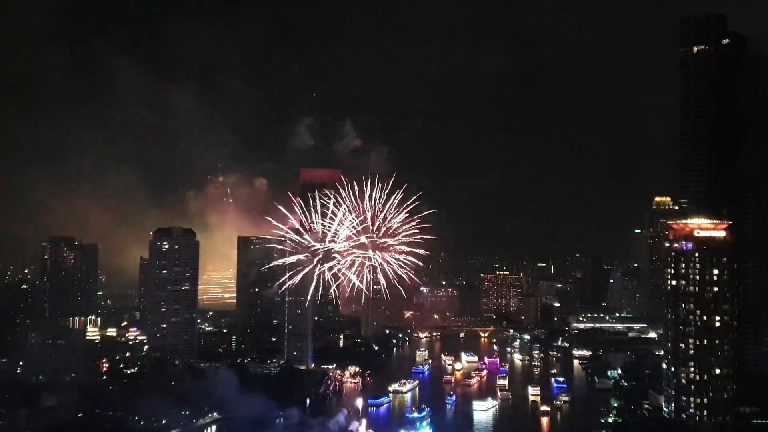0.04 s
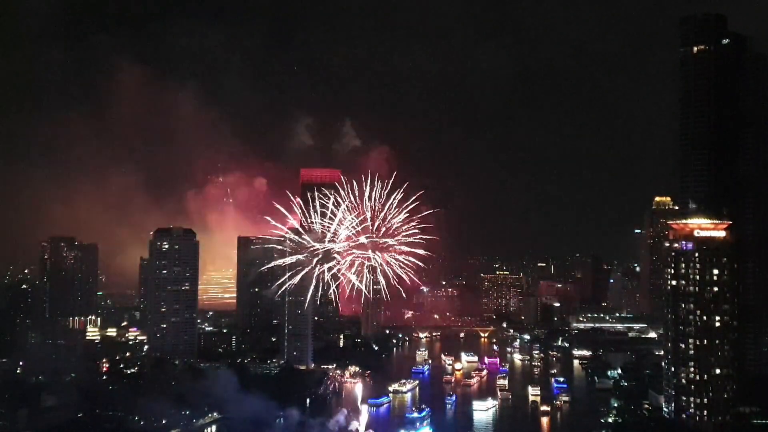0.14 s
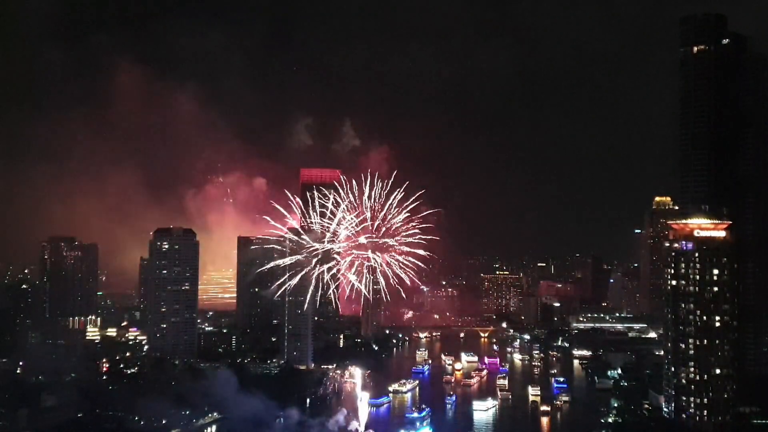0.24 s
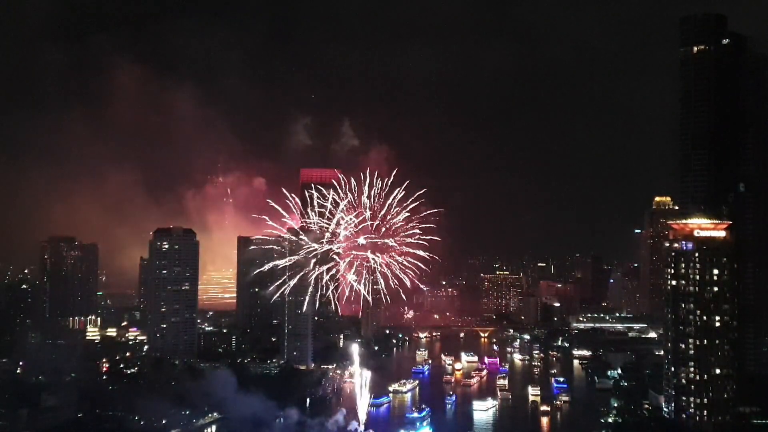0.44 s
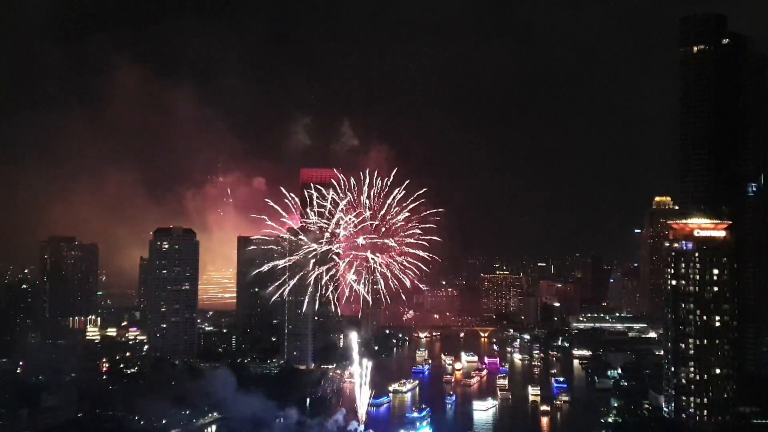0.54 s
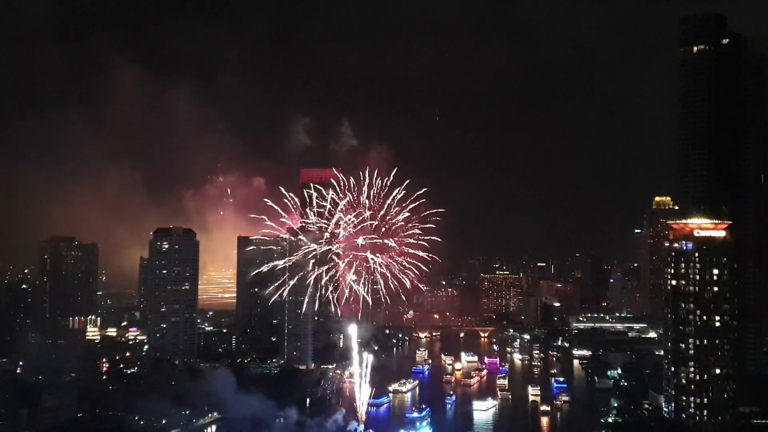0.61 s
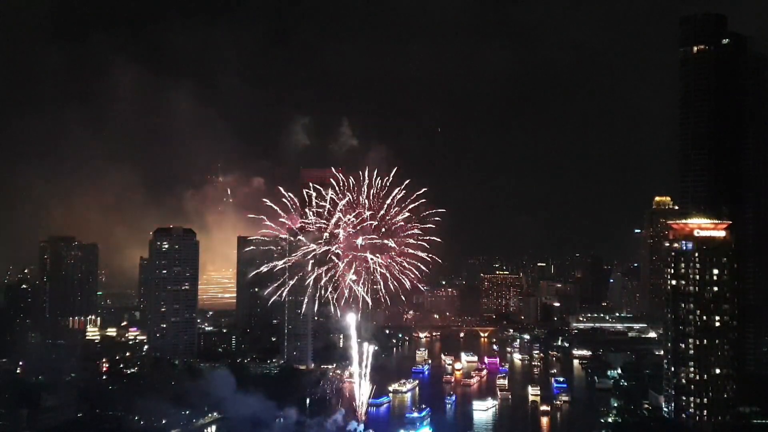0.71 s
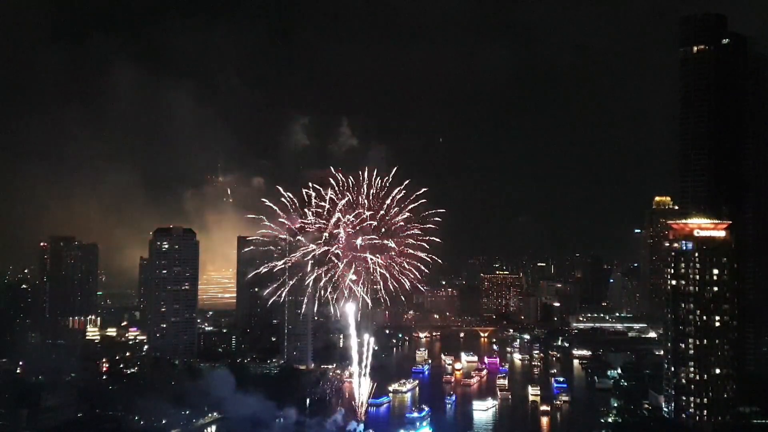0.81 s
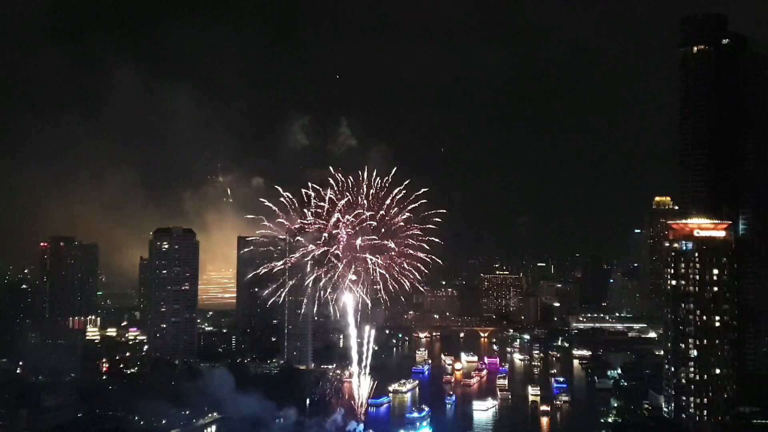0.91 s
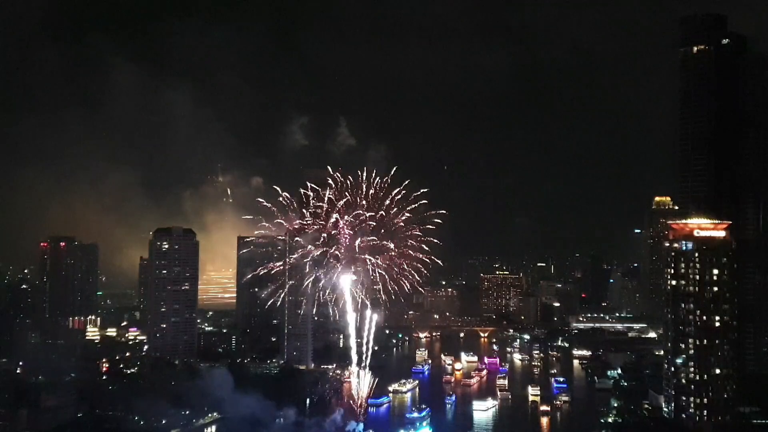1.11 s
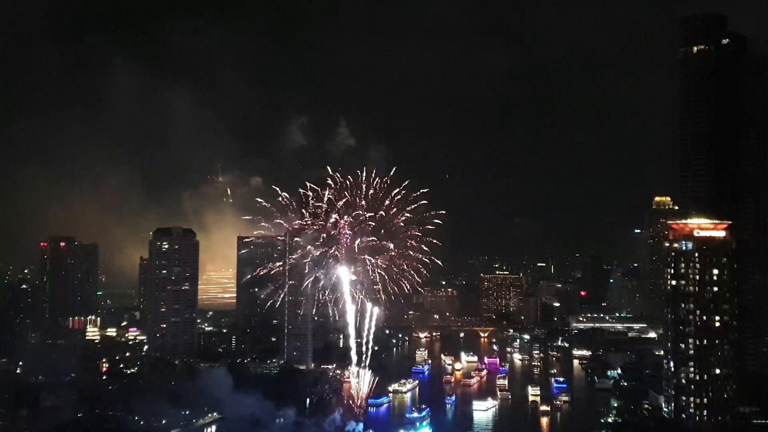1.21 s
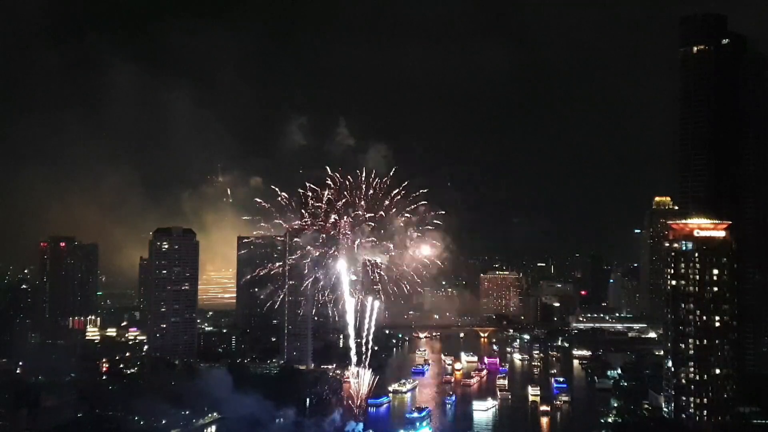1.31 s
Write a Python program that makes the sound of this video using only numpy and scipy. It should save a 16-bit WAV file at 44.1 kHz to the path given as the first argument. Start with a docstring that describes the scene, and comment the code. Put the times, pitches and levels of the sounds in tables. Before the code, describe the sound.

Distant fireworks burst in a rapid salvo of deep overlapping booms, rumbling across a night city

```python
"""High balcony over a river city at night: a salvo of firework shells bursts far off, two microphones.
Each blast is a shock wave that arrives directly, then again off the nearby walls; the city's house
fronts scatter it into a quick wash and a long rumble, noise bands over the steady rumble left from
earlier bursts. Three of the shocks rattle something loose near the microphones: noise knocks ring it."""
import sys
import numpy as np
from scipy import signal
from scipy.fft import rfft, irfft
from scipy.io import wavfile
from scipy.ndimage import uniform_filter1d

SR = 44100
rng = np.random.default_rng(int(sys.argv[2]) if len(sys.argv) > 2 else 0)


def boost_factor(decibels):
    """Convert a level in decibels to a linear amplitude factor."""
    exponent = np.asarray(decibels, float) / 20
    return 10 ** exponent


def to_wav(s):
    """Save 16-bit WAV."""
    ch = np.atleast_2d(s).T  # columns
    pcm = np.round(np.clip(ch, -1, 1) * 32767)  # PCM
    wavfile.write(sys.argv[1], SR, pcm.astype(np.int16))


N = 59535  # samples, 1.35 s
T = np.arange(N) / SR
FREQS = np.arange(N // 2 + 1) * SR / N


def band(hz, width_hz):
    """Noise of rms 1 in a bell-shaped band around hz."""
    bell = np.exp(-((FREQS - hz) / width_hz) ** 2 * 2)
    noise = irfft(rfft(rng.standard_normal(N)) * bell, N)
    return noise / np.sqrt(np.mean(noise ** 2))


def late(x, ms, blur_ms):
    """Delay by ms plus blur_ms, with a Gaussian loss of treble that rounds off the edges."""
    delay = np.exp(-2j * np.pi * FREQS * (ms + blur_ms) / 1000)
    rounding = np.exp(-(FREQS * blur_ms / 1000) ** 2 * 2)
    return irfft(rfft(x) * delay * rounding, N)


# The distant shells, also played by blasts(). Each row: burst time in seconds before any path delay,
# level in dB before the path gains, quick wash in the middle and in the treble in dB above usual,
# length of the positive phase in ms.
SHELLS = [(0.079, -30.5, -5, 5, 2.3), (0.2041, -7.0, 2.5, 3, 2.5), (0.3401, -17, -14, -15, 14),
          (0.3631, -8.5, -17.5, 0.5, 2.37), (0.3764, -15.5, -3, -7.5, 1.76), (0.4032, -19.5, -4.5, -5, 9.6),
          (0.4157, -17, -6.5, -9, 5), (0.4453, -8, 1.5, -0.5, 2.15), (0.5434, -3.5, 0.5, -5, 4.4),
          (0.5509, -11.5, 3, 4.5, 3.3), (0.5872, -17.5, 12, 6, 1.8), (0.6405, -24.3, 0.5, -6, 1.44),
          (0.677, -26.5, 0.5, 0, 2.1), (0.6961, -8.5, -14.5, -6, 1.17), (0.7077, -9.0, -8, 0.5, 2.66),
          (0.7193, -6, 8, 2, 3.35), (0.734, -24, 14.5, 11.5, 5.8), (0.7476, -23, 2.5, 0, 3.6),
          (0.763, -13.9, -4, 2.5, 0.99), (0.7809, -22, -4.5, -3, 3.6), (0.8439, -16, -6, -9, 4.5),
          (0.8596, -13.5, 0, -1.5, 7.6), (0.882, -10.8, 1.5, 0.5, 2.8), (0.9177, -13, -10, -2, 1.7),
          (0.9383, -16, -10, -2, 3.1), (0.9603, -17, -3, -2, 5.5), (0.9724, -15, 2, 2, 3.7),
          (0.9995, -28.5, -2, -5, 6.1), (1.0462, -17, -3, -5, 6.2), (1.0598, -27, -2, -7, 3.4),
          (1.1696, -29.5, 3, 7, 3.2), (1.244, -16.5, -15.5, -12, 1.16)]
# House fronts all over the city, by frequency band. Each row: band centre in Hz, quick wash in dB for
# a 0 dB shell, its t60 in seconds, long rumble in dB for a 0 dB shell, its t60 in seconds,
# steady rumble left from earlier bursts in dB before the patchiness.
CITY_BANDS = [(32, -54, 0.22, -37.5, 2.3, -57), (54, -37.5, 0.34, -30, 0.7, -36.5),
              (75, -35, 0.44, -28.5, 2.2, -42), (115.6, -29, 0.38, -22.5, 1.55, -44.5),
              (160.6, -16.5, 0.28, -28.5, 2.9, -43.5), (239.2, -28, 0.6, -35.5, 2.9, -51),
              (347, -24.5, 0.23, -35.5, 1.4, -56.5), (458, -37, 0.39, -47, 1.9, -60),
              (616, -32, 0.29, -38, 1.89, -54.5), (915, -35, 0.26, -42.5, 2.3, -59),
              (1414, -37.5, 0.27, -45.5, 2.3, -60), (2080, -39, .2, -48.5, 1.9, -69.5),
              (2710, -49, 0.24, -52, 1.6, -74), (4020, -54.5, 0.37, -60.5, 1.3, -70),
              (6230, -57, 0.24, -66.5, 1.5, -69)]
# Scattered sound at the microphone pair. Each row: frequency in Hz, share of the power that both
# microphones hear alike (0-1).
SHARED_POWER = [(60, 0.98), (140, 0.97), (300, 0.75), (600, 0.32), (1200, 0.5), (2500, 0), (5000, 0.2)]


def city():
    """Per band, noise whose power leaps and decays after every shell, over a steady earlier rumble."""
    swell_s, bass_swell_s = 0.0029, 0.0083  # build-up time constant, and what the bass adds to it
    fronts_per_s, patchy_db = 140, 1
    right_later_ms = 0.36
    # single house fronts stand out: random levels, joined by straight lines
    hold = int(SR / fronts_per_s)
    steps = np.repeat(rng.standard_normal(N // hold + 1), hold)
    fronts = uniform_filter1d(steps, hold)[:N]
    patches = boost_factor(patchy_db * fronts)
    share_hz, shares = np.transpose(SHARED_POWER)
    out = np.zeros((2, N))
    for hz, wash_db, wash_s, rumble_db, rumble_s, earlier_db in CITY_BANDS:
        power = np.full(N, boost_factor(2 * earlier_db))
        swell = swell_s + bass_swell_s * max(1 - hz / 800, 0) ** 2
        for start, db, middle_db, treble_db, _ in SHELLS:
            colour_db = np.interp(np.log(hz), np.log([120, 500, 2200]), [0, middle_db, treble_db])
            age = np.maximum(T - start, 0)
            wash = boost_factor(2 * (wash_db + colour_db) - 120 * age / wash_s)
            rumble = boost_factor(2 * rumble_db - 120 * age / rumble_s)
            power += boost_factor(2 * db) * (1 - np.exp(-age / swell)) * (wash + rumble)
        share = np.interp(np.log(hz), np.log(share_hz), shares)
        both, left, right = (band(hz, 0.41 * hz) for _ in range(3))
        alike = np.array([both, late(both, right_later_ms, 0)])
        apart = np.array([left, right])
        pair = np.sqrt(share) * alike + np.sqrt(1 - share) * apart
        out += np.sqrt(power) * patches * pair
    return out


# Self-noise of the left, then the right microphone. Each row: centre in Hz, width in Hz,
# level in dB before the microphone filters.
MICROPHONE_HISS = [(6800, 2600, -74), (7900, 3400, -69)]


def hiss():
    """One steady, independent noise band per microphone."""
    return np.array([boost_factor(db) * band(hz, width_hz) for hz, width_hz, db in MICROPHONE_HISS])


# Ways to the balcony: direct, then off the nearby walls. Each row: delay in ms on top of the blur,
# gain in dB, blur in ms, extra delay at the right microphone in ms.
BALCONY_PATHS = [(-0.0, -2.0, 1.3, 0.45), (6.6, 8.5, 4.6, 0.3), (13.3, 8.0, 4.9, 0.15),
                 (23.2, 11.9, 5.2, 0.3), (29.8, 3.3, 4.4, 0.2), (37.1, 7.5, 4.4, 0.3),
                 (43.8, 1.7, 7.0, 0.2), (52.0, 1.4, 5.7, 0.3), (66.0, -4.8, 6.0, 0.2)]


def blasts():
    """A sudden overpressure that sags into suction and dies away, once along every path."""
    suction = 0.84  # decay exponent per positive phase
    wave = np.zeros(N)
    for start, db, _, _, positive_ms in SHELLS:
        phase = np.clip((T - start) * 1000 / positive_ms, 0, 60)  # 1 where pressure turns to suction
        wave += boost_factor(db) * (phase > 0) * (1 - phase) * np.exp(-suction * phase)
    out = np.zeros((2, N))
    for ms, db, blur_ms, right_ms in BALCONY_PATHS:
        left = late(wave, ms, blur_ms)
        right = late(wave, ms + right_ms, blur_ms)
        out += boost_factor(db) * np.array([left, right])
    return out


# Knocks on the loose part close by. Each row: start in seconds, level in dB before the ringing.
KNOCKS = [(.2105, -64), (.4505, -67.5), (0.558, -62)]
# Resonances of the loose part. Each row: frequency in Hz, level in dB, t60 in seconds.
LOOSE_PART_MODES = [(3820, -8, .03), (4650, -6.5, 0.0066), (5200, -0.5, 0.048), (5840, -3.5, 0.0092),
                    (6580, -3.5, 0.0072), (7240, -4.5, 0.0074)]


def rattle():
    """Short decaying noise knocks ring the damped modes of a small loose part."""
    knock_decay_s = 0.0013
    envelope = np.zeros(N)
    for start, db in KNOCKS:
        age = np.maximum(T - start, 0)
        envelope += boost_factor(db) * (T > start) * np.exp(-age / knock_decay_s)
    knocks = envelope * rng.standard_normal((2, N))
    t = T[:SR // 10]
    ring = np.zeros(len(t))
    for hz, db, t60 in LOOSE_PART_MODES:
        ring += boost_factor(db - 60 * t / t60) * np.sin(2 * np.pi * hz * t)
    return signal.fftconvolve(knocks, ring[None], axes=1)[:, :N]


def scene():
    """Sound scattered by the city, the blasts and the rattle."""
    return city() + blasts() + rattle()


# Upper limit of the microphones. The entries: left, then right corner in Hz.
TREBLE_LIMIT_HZ = [8250, 9500]


def microphones(x):
    """Lose the deepest bass, then cut the treble steeply, lower on the left than on the right."""
    low_cut = signal.butter(4, 34, "high", fs=SR, output="sos")  # corner in Hz
    x = signal.sosfilt(low_cut, x)
    channels = []
    for hz, channel in zip(TREBLE_LIMIT_HZ, x):
        top_cut = signal.ellip(8, 0.5, 45, hz, fs=SR, output="sos")  # ripple, stop band in dB
        channels.append(signal.sosfilt(top_cut, channel))
    return np.array(channels)


def band_limit(x):
    """A steep low-pass at the top of the band."""
    return signal.sosfilt(signal.butter(12, 11500, fs=SR, output="sos"), x)


def record(dry):
    """The balcony's two microphones add their hiss and limit bass and treble."""
    mix = microphones(dry + hiss())
    return band_limit(mix)


dry = scene()
out = record(dry)
to_wav(out)
```